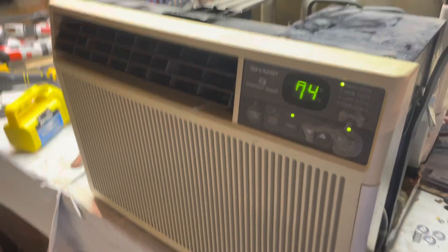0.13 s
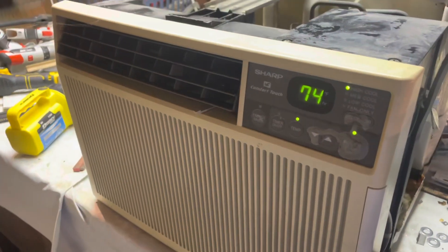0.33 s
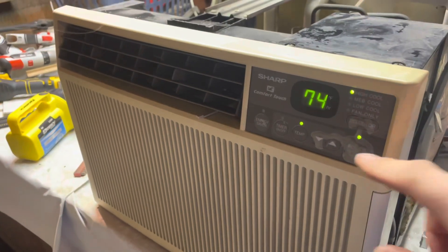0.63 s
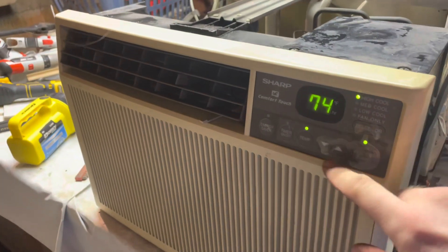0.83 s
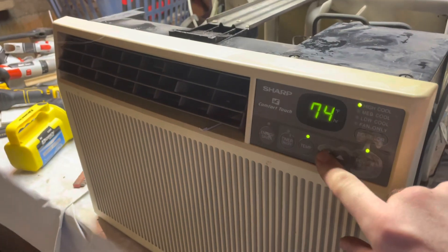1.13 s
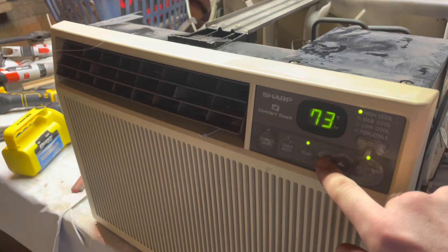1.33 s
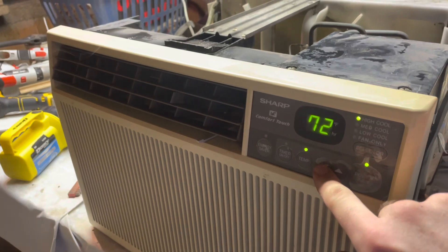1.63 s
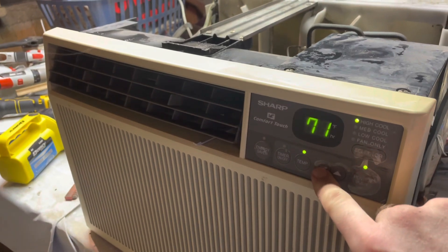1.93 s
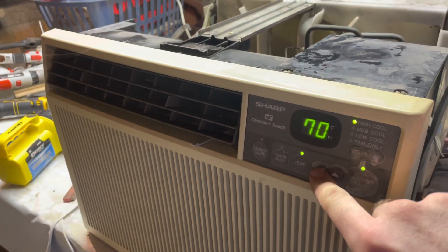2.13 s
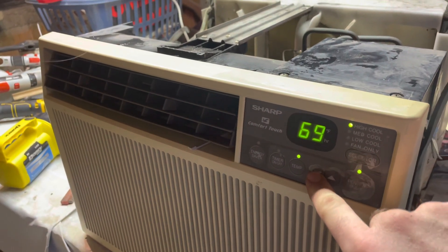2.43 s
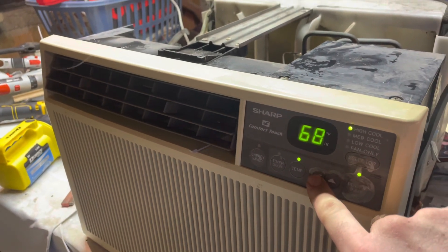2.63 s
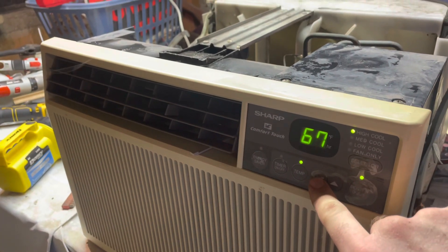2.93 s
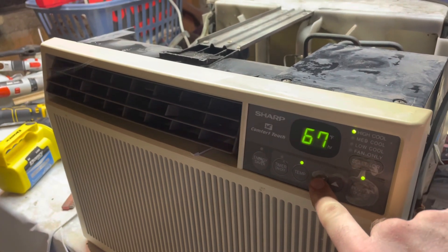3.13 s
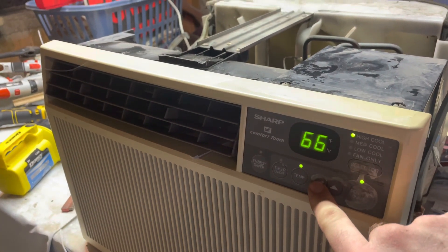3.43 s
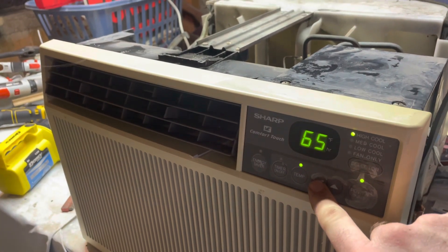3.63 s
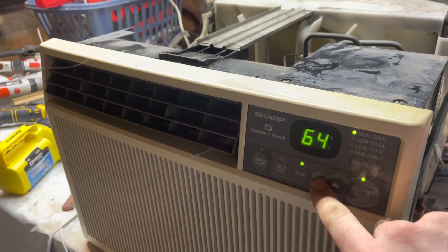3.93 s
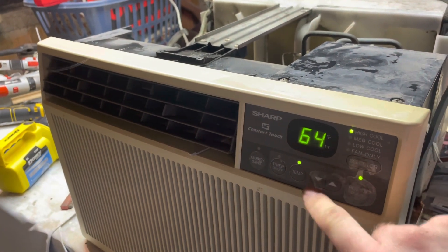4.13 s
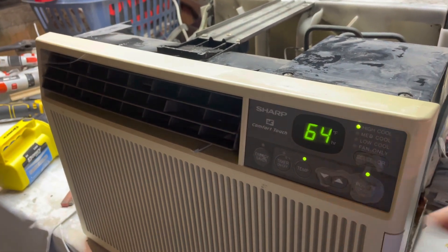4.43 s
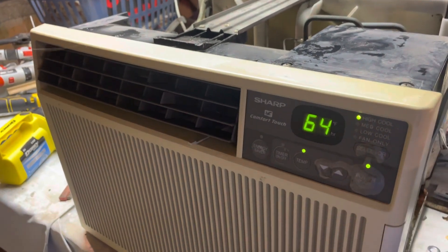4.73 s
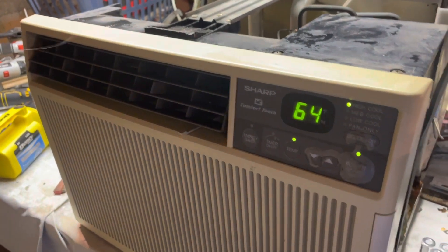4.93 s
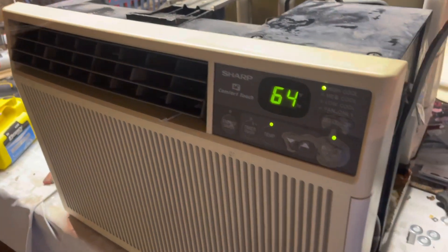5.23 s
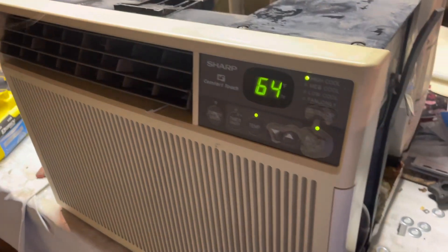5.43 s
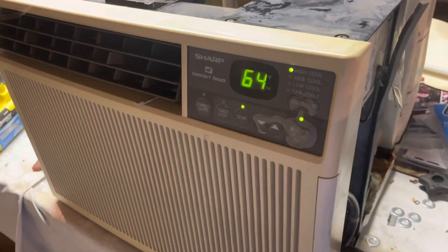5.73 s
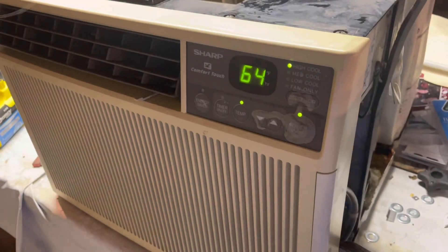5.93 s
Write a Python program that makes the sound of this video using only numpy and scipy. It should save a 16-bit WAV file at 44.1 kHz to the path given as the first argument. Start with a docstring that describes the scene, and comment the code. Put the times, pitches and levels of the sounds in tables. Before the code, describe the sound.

A window air conditioner runs steadily up close, a low constant motor hum under a full rush of fan air with tiny faint ticks.

```python
"""Window air conditioner in a workshop

Heard close up through the two microphone ports of a handheld camera. The motor hums at four times
the mains and the fan blades sing: sines with slowly wavering level and phase, beside faint thin whines.
A steady rush of air is coloured, drifting noise, partly shared by the ports. Faint ticks, bursts of
band-passed noise, crackle in the top treble, and two dull blips are short fading sines."""
import sys
import numpy as np
from scipy import signal
from scipy.fft import rfft, irfft
from scipy.io import wavfile
from scipy.ndimage import uniform_filter1d

SR = 44100
rng = np.random.default_rng(int(sys.argv[2]) if len(sys.argv) > 2 else 0)


def wav_out(sig):
    """Save sig, one row per channel (or a flat mono array), as 16-bit PCM at SR to the path in sys.argv[1]."""
    wavfile.write(sys.argv[1], SR, np.round(np.clip(np.atleast_2d(sig).T, -1, 1) * 32767).astype(np.int16))


N = 268789  # length in samples


def gain_of(db):
    """Turns decibels into an amplitude factor."""
    return 10 ** (np.asarray(db) / 20)


def evened(x):
    """Scales to rms 1."""
    return x / np.sqrt(np.mean(x ** 2) + 1e-20)


def drift(t, slow_hz, fast_hz):
    """Random modulation of rms 1: sines of random phase, the faster ones weaker."""
    rates_hz = np.geomspace(slow_hz, fast_hz, num=20)
    return evened(sum(np.sin(2 * np.pi * (f * t + rng.random())) / np.sqrt(f) for f in rates_hz))


def tone(hz, db, right_db, lead, waver_db, wander):
    """A sustained sine at both ports; level wavers (dB rms) and phase wanders (radians rms)."""
    t = np.arange(N) / SR
    coarse = np.arange(0, N / SR + .02, .01)  # drifts are slow enough for 10 ms steps
    level = gain_of(db + waver_db * np.interp(t, coarse, drift(coarse, 0.503, 6)))
    phase_drift = wander * np.interp(t, coarse, drift(coarse, .1, 1.5))
    phase = 2 * np.pi * (hz * t + rng.random()) + phase_drift
    left = gain_of(-right_db / 2) * np.sin(phase + lead)
    right = gain_of(right_db / 2) * np.sin(phase)
    return np.sqrt(2) * level * np.array([left, right])  # sqrt(2) turns rms level into peak


def motor():
    """Magnetic hum of the motor at multiples of the mains frequency."""
    mains_hz = 60.0
    # hum partials: (multiple [1], level [dB rms], right minus left [dB], left leads by [rad])
    hum = [(4, -20.5, 2.5, 0.2), (8, -54.5, 5, 0.0095)]
    return sum(tone(k * mains_hz, *rest, waver_db=0.13, wander=.1) for k, *rest in hum)


def fans():
    """Blades passing the housing sing a pitch and its multiples; higher multiples wander more."""
    blade_hz, wheel_hz = 170.4, 203.1
    # blade partials: (multiple [1], level [dB rms], right minus left [dB], left leads by [rad])
    blades = [(1, -29.8, .6, -.29), (2, -51, 1, 0), (3, -53, 0, 1.1)]
    # partials of likely the second fan on the shaft, same columns:
    # (multiple [1], level [dB rms], right minus left [dB], left leads by [rad])
    wheel = [(1, -50.5, 0.11, 0.0083), (3, -52.5, -1.3, 0.32)]
    partials = [(blade_hz, row) for row in blades] + [(wheel_hz, row) for row in wheel]
    return sum(tone(k * hz, *rest, waver_db=0.2, wander=0.11 * k) for hz, (k, *rest) in partials)


def whines():
    """Thin tones that barely stand out of the air, with strongly wavering level and phase."""
    # pitches of the thin tones: (frequency [Hz])
    pitches = [327, 456.2, 644, 883.5, 1117, 1135.9, 2327.6]
    # one row per pitch: (level [dB rms], right minus left [dB], left leads by [rad])
    levels = [(-48, 3.5, 0.0056), (-57, 1.5, 0.019), (-52.5, 0, 1), (-54, 0.5, .1), (-54.5, -3, 0.53),
              (-60.5, 2, 0.079), (-70, 2.5, 0.088)]
    return sum(tone(hz, *row, waver_db=4, wander=1.6) for hz, row in zip(pitches, levels))


def bump(hz, centre_hz, width_hz):
    """A flat-topped hill of height 1 over frequency, width_hz wide at half height."""
    return 1 / (1 + (2 * (hz - centre_hz) / width_hz) ** 4)


def read(points, hz, column=1):
    """Reads a table joined by straight lines on a log-frequency axis."""
    table = np.transpose(points)
    return np.interp(np.log(hz + 1), np.log(table[0] + 1), table[column])


def turbulence(size):
    """Two noise streams under one drifting time-frequency level, some bands swelling on their own."""
    # swells of the middle of the rush: (time [s], level [dB])
    middle = [(0, 2.5), (.15, 0.5), (.5, -2.5), (1.4, 1.5), (2.3, 0), (4.4, 0.5), (5.0, 2), (5.5, 0.5),
              (5.85, 1.5), (6.09, 0.5)]
    # uneven swells of the low boom: (time [s], level [dB])
    boom = [(0, -1.5), (.3, 3), (1.3, -3.5), (1.7, 2), (2.6, -0.5), (3, 3.5), (3.4, -4), (3.7, 2),
            (3.9, -1.5), (4.15, 0.5), (4.7, -1), (5.5, -1.5), (5.8, 3.5), (6.09, -1)]
    # swells of the top treble: (time [s], level [dB])
    treble = [(0, 0.5), (.8, -1), (1, 1.5), (1.6, 1), (2.15, -2), (2.32, 1), (2.5, -1.5), (3.15, 0.5),
              (3.45, -1), (5, -0.5), (6.09, -0.5)]
    hop = size // 4
    frames, hz = N // hop + 5, np.fft.rfftfreq(size, 1 / SR)
    t = np.arange(frames) * hop / SR
    a, b, c, d, patches = rng.standard_normal((frames, len(hz), 5)).T

    # smooth over frequency, then over time
    patches = uniform_filter1d(patches, size=12, axis=0)
    patches = evened(uniform_filter1d(patches, size=10, axis=1))
    field_db = .8 * patches + 0.5 * drift(t, 0.21, 2.1)

    middle_band = bump(hz, centre_hz=1200, width_hz=690)[:, None]
    boom_band = bump(hz, centre_hz=140, width_hz=22)[:, None]
    treble_band = bump(hz, centre_hz=15000, width_hz=3300)[:, None]
    body_band = bump(hz, centre_hz=470, width_hz=330)[:, None]
    puffs_db, surge_db = 1, 1.06  # rms depth of treble puffs and of short surges in the body
    field_db += middle_band * np.interp(t, *np.transpose(middle))
    field_db += boom_band * np.interp(t, *np.transpose(boom))
    field_db += puffs_db * treble_band * drift(t, 4.6, 30)
    field_db += treble_band * np.interp(t, *np.transpose(treble))
    field_db += surge_db * body_band * drift(t, 1.496, 12)

    spectra = np.array([a + 1j * b, c + 1j * d])
    frame = dict(nperseg=size, noverlap=size - hop)
    white_rms = signal.istft(spectra[0], **frame)[1].std()  # level without the swells
    return signal.istft(spectra * gain_of(field_db), **frame)[1][:, :N] / white_rms


def air():
    """Turbulence coloured by the grille and its cavities, partly shared by the ports."""
    # shared air before cavities and swells, lower part: (frequency [Hz], level [dB per Hz])
    rush = [(18, -88), (30, -76.5), (41, -64.5), (60, -60.5), (95, -60), (150, -55.5), (195, -56),
            (250, -52.5), (340, -57), (400, -61), (700, -67.5), (920, -70.5), (1300, -70.5), (1600, -76.5)]
    # the same, upper part, starting on the last row of the lower: (frequency [Hz], level [dB per Hz])
    hiss = [(1600, -76.5), (2100, -78), (2450, -83), (3300, -85), (5300, -89.5), (5550, -95), (7500, -93.5),
            (7800, -105), (8600, -114), (9900, -107), (10400, -102.5), (11500, -102), (13500, -99),
            (14600, -102.5), (15700, -106)]
    # air that differs between the ports, likewise: (frequency [Hz], level [dB per Hz])
    differing = [(25, -92), (60, -79.5), (120, -72.5), (190, -69.5), (290, -68.5), (420, -72.5), (700, -73),
                 (1300, -76), (2300, -86.5), (3300, -86.5), (5300, -95), (5600, -95), (8000, -96),
                 (11700, -102), (12700, -125)]
    # cavities the air blows across, and dips between them:
    # (frequency [Hz], width [Hz], lift of shared air [dB], lift of differing air [dB])
    cavities = [(116.6, 14, 3.5, 3), (127, 11.5, 8, 7), (138.5, 9, -4, -3.5), (193, 12, -3, 0),
                (215, 9.7, -5.5, 3), (262, 12, 0.5, 3), (275, 10, -2.5, 1.5), (335, 43, 2, 4),
                (403.5, 8.1, 3, -1), (470, 56, 2.5, 1), (625, 32, -2.5, 0), (970, 91, -2.5, 0),
                (1014, 50, 2.5, -0.5), (1070, 50, -0.5, -1.5), (1130, 41, -0.5, 0.5), (7550, 400, -4, 5.5),
                (9100, 640, -10, 6.5)]
    # tie of the differing air to the shared air:
    # (frequency [Hz], part in step [-1..1], part a quarter turn apart [-1..1])
    ties = [(40, 0.1, -.4), (104, 0, -0.5), (200, -0.2, -.4), (280, -.7, -0.3), (410, -.7, 0.2),
            (550, 0.3, -0.1), (1600, .05, 0.2), (2490, .1, 0), (3260, 0.3, .4), (4800, .3, .38),
            (6240, 0, -0.4), (7800, -0, -0.3), (8500, -0.2, 0.2), (11300, 0.2, .45)]
    hz = np.fft.rfftfreq(N, 1 / SR)
    shared, other = rfft(turbulence(size=2048), axis=1) * np.sqrt(SR / 2)  # unit power per Hz
    shared_db, wide_db = read([*rush, *hiss[1:]], hz), read(differing, hz)
    for centre_hz, width_hz, lift_db, wide_lift_db in cavities:
        hill = bump(hz, centre_hz, width_hz)
        shared_db = shared_db + lift_db * hill
        wide_db = wide_db + wide_lift_db * hill
    tie = read(ties, hz) + 1j * read(ties, hz, column=2)
    untied = np.sqrt(np.clip(1 - abs(tie) ** 2, 0, 1))  # keeps the power at any tie
    wide = tie * shared + untied * other
    mid = irfft(shared * gain_of(shared_db), N)
    side = irfft(wide * gain_of(wide_db), N)
    return np.array([mid + side, mid - side])


def bright(x, hz):
    """Keeps a band 3200 Hz wide around hz and scales to peak 1."""
    half_hz = 3200 / 2
    band = signal.butter(2, [hz - half_hz, hz + half_hz], "band", fs=SR, output="sos")
    kept = signal.sosfilt(band, x)
    return kept / abs(kept).max()


def ticks():
    """Short bright noise bursts, each in its own band, among smaller ones that come in clumps."""
    # the clearest ticks: (start [s], peak level [dB], centre [Hz])
    clear_ticks = [(0.1371, -48, 12600), (0.2164, -47, 12800), (0.2438, -43, 12900), (0.2977, -39, 13500),
                   (0.4105, -49, 11700), (0.4863, -50, 12700), (0.4904, -48, 12700), (0.5387, -48, 13600),
                   (0.6, -50, 13200), (0.6888, -48, 13600), (0.8854, -42, 13500), (0.9218, -46, 14200),
                   (0.9487, -48, 13300), (1.0425, -46, 12700), (1.2306, -48, 13800), (1.2575, -46, 13100),
                   (1.2999, -50, 12400), (1.704, -48, 13300), (1.7968, -49, 12400), (1.946, -48, 14000),
                   (2.3027, -45, 13000), (2.3306, -47, 12900), (2.9587, -45, 13400), (3.021, -43, 13300),
                   (3.0644, -48, 13800), (3.1652, -45, 13300), (3.2031, -47, 13400), (3.2525, -45, 13500),
                   (4.0108, -53, 13100), (4.3884, -40, 13700), (4.4598, -48, 12600), (4.4867, -48, 13900),
                   (4.8783, -50, 13700), (5.5403, -48, 13000)]
    rise_s, fade_s = .0004, .0025
    t, out = np.arange(600) / SR, np.zeros(N + 600)
    envelope = (1 - np.exp(-t / rise_s)) * np.exp(-t / fade_s)
    grit = rng.standard_normal((len(clear_ticks), len(t)))
    for (start_s, peak_db, hz), noise in zip(clear_ticks, grit):
        burst = bright(noise * envelope, hz)
        out[round(start_s * SR):][:len(t)] += gain_of(peak_db) * burst

    # small ticks share one grain; level and moment are random
    floor_db, base_per_s = -60.5, 53
    coarse = np.arange(0, N / SR + .02, .01)
    clumps = np.exp(0.75 * np.interp(np.arange(N) / SR, coarse, drift(coarse, .5, 8)))
    small_db = floor_db + 2.7 * np.minimum(rng.exponential(1, N), 4)
    struck = rng.random(N) < clumps * base_per_s / SR
    grain = bright(rng.standard_normal(len(t)) * np.exp(-t / .0008), 13400)
    return out[:N] + signal.oaconvolve(gain_of(small_db) * struck, grain)[:N]


def blip():
    """Dull blips in the rush, one low and one in the middle: sines that swell softly and fade."""
    # (start [s], envelope peak [dB], frequency [Hz], rise [s], fade [s])
    rings = [(3.665, -26.5, 121.3, 0.017, 0.031), (5.908, -33, 1287, .006, 0.01)]
    out = np.zeros(N)
    for start_s, peak_db, hz, rise_s, fade_s in rings:
        t = np.clip(np.arange(N) / SR - start_s, 0, None)
        shape = (1 - np.exp(-t / rise_s)) ** 2 * np.exp(-t / fade_s)
        ring = np.sin(2 * np.pi * (hz * t + rng.random()))
        out += gain_of(peak_db) * shape / shape.max() * ring
    return out


def scene():
    """Adds all sources at the two ports; ticks and blips reach both alike."""
    return motor() + fans() + whines() + air() + ticks() + blip()


def record(dry):
    """The band limit of the camera: a steep low-pass."""
    edge_hz = 15720
    lowpass = signal.firwin(1023, edge_hz, window=("kaiser", 9), fs=SR)
    return signal.oaconvolve(dry, lowpass[None], "same")


dry = scene()
out = record(dry)
wav_out(out)
```